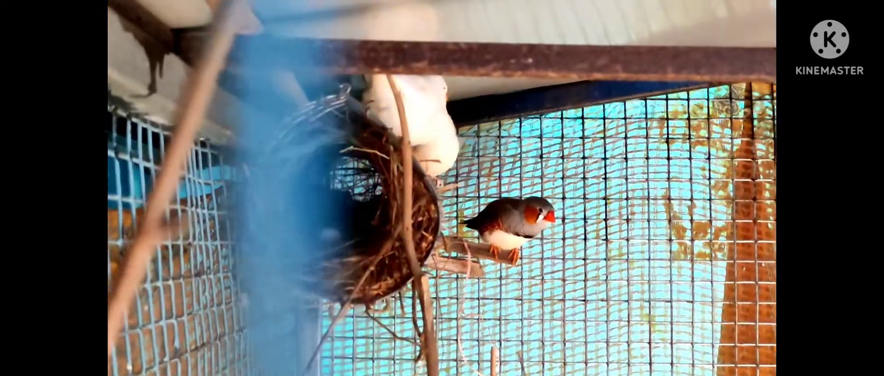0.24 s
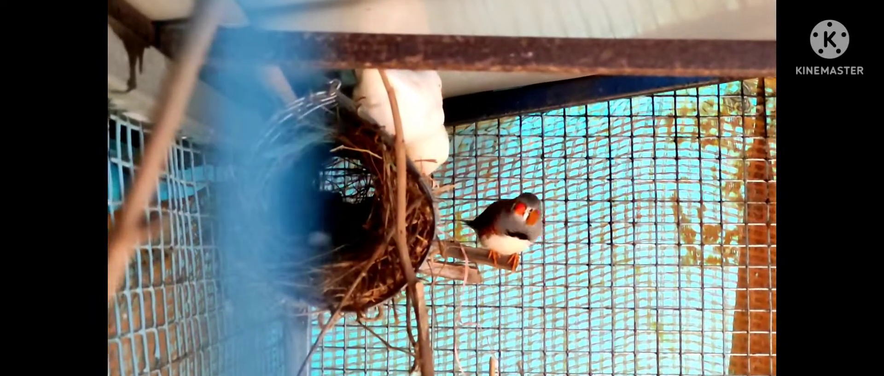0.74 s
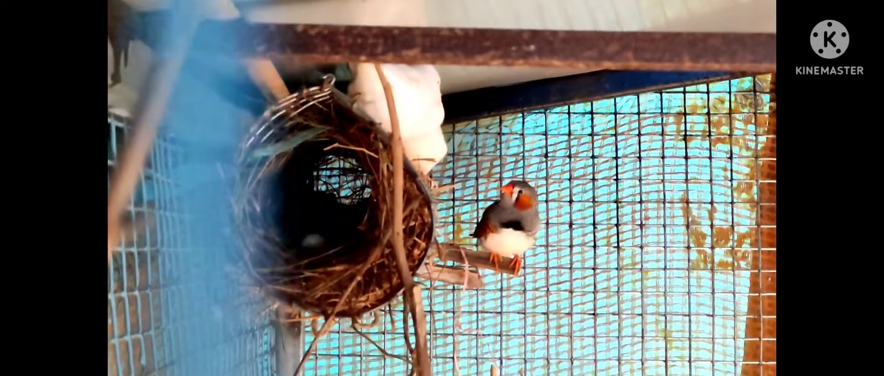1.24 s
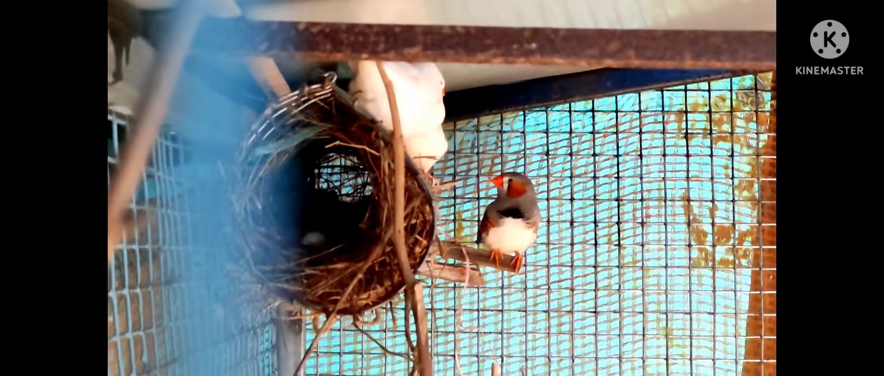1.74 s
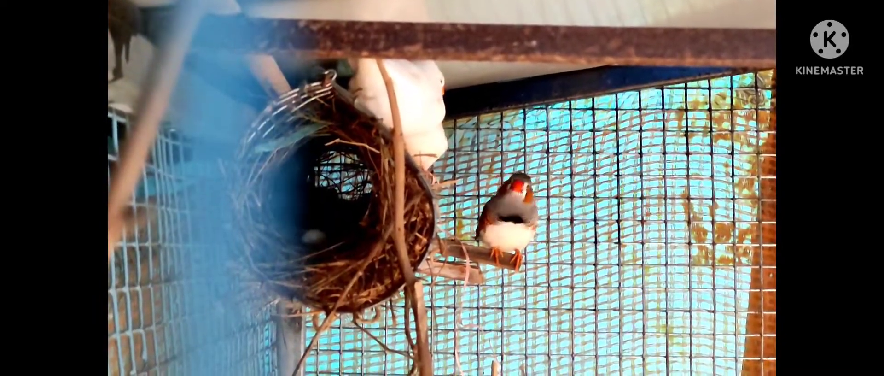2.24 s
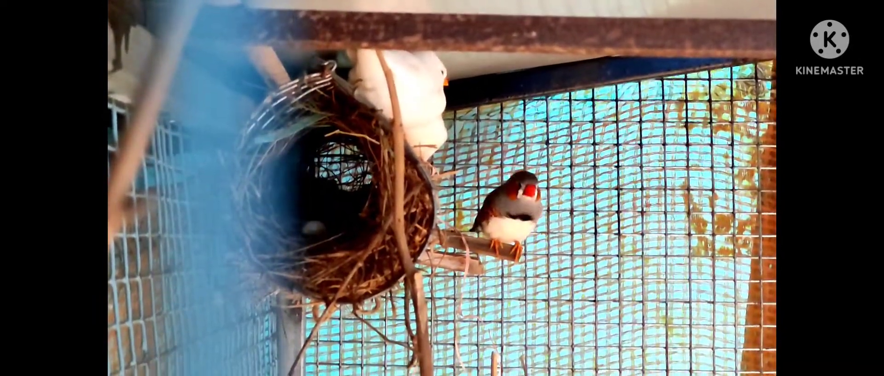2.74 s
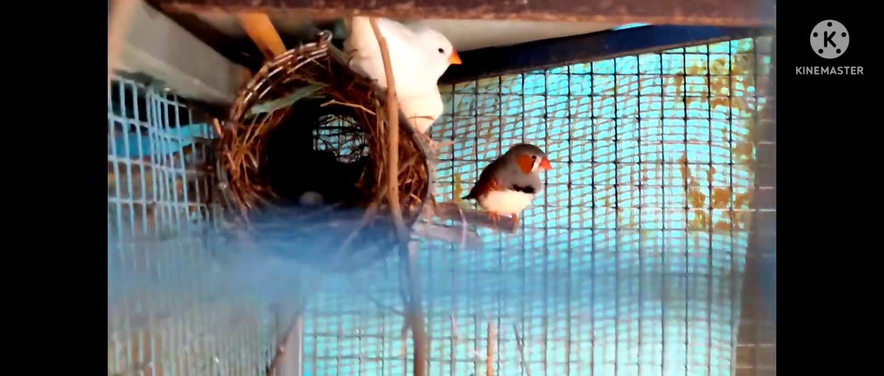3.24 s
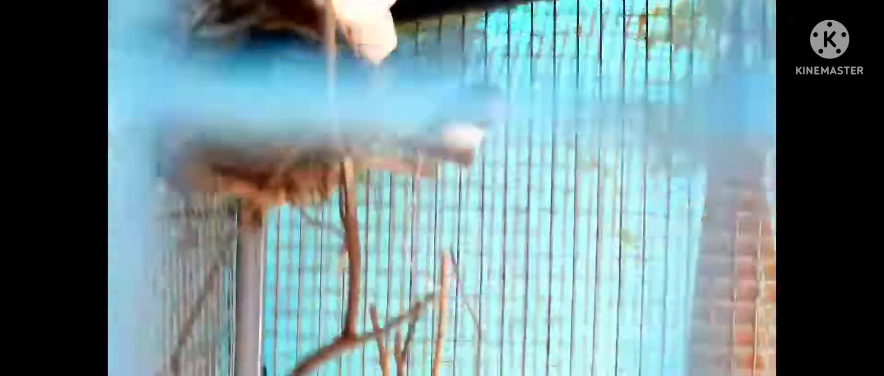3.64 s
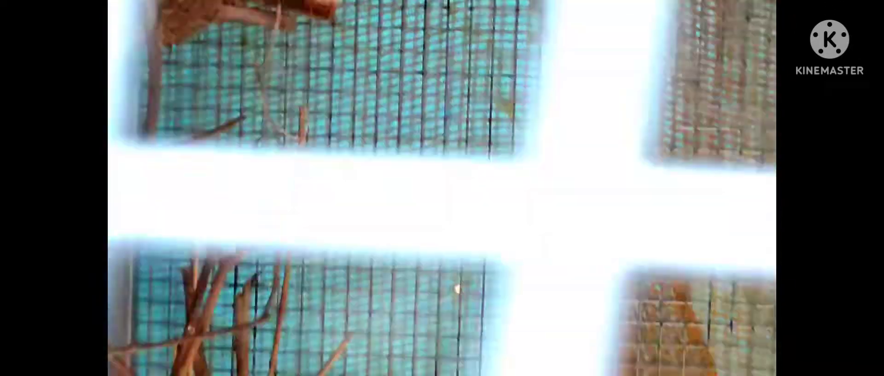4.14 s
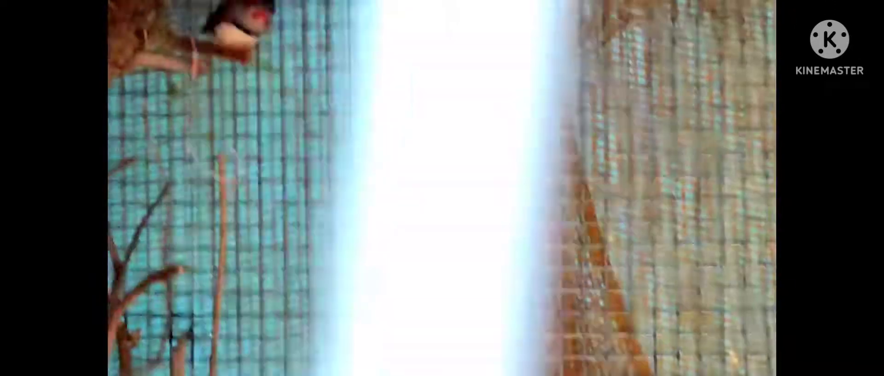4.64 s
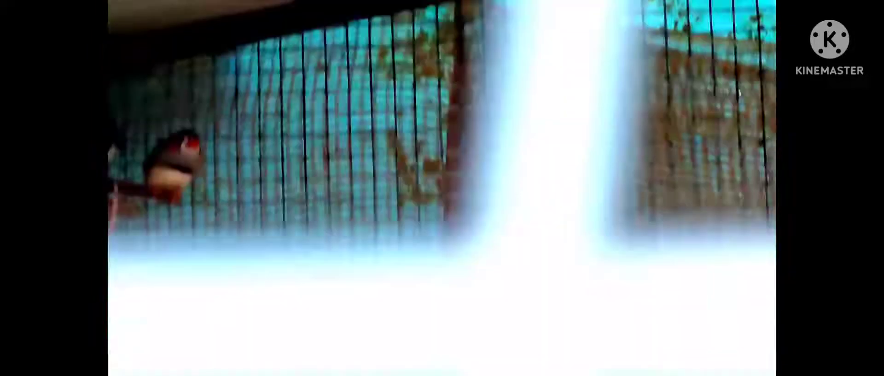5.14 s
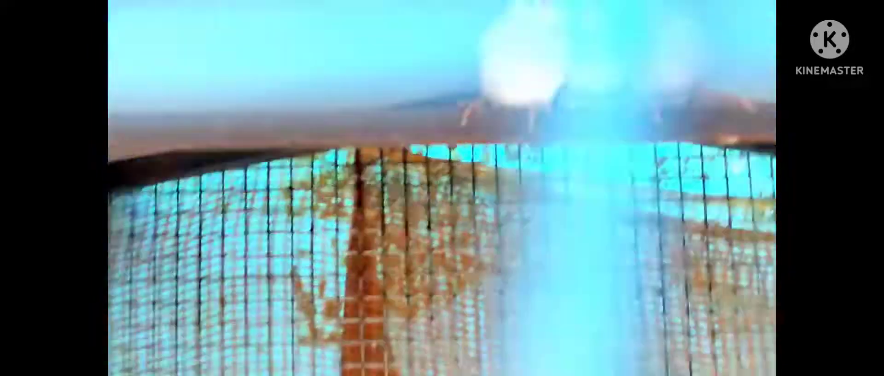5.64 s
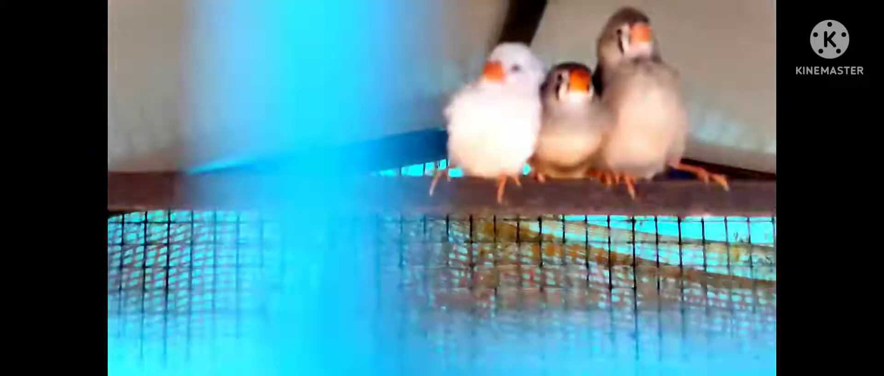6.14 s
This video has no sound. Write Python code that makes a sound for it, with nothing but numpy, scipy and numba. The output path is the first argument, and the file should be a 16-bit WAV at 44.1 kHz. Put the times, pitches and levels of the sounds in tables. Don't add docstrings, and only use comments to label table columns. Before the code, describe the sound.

Finch chicks rasp rapidly for food in a wire aviary while adults give nasal calls; midway a close bird shrieks with fluttering wings, then rumbling wind.

```python
import sys
import numpy as np
from scipy import signal
from scipy.fft import rfft, irfft
from scipy.io import wavfile
from scipy.ndimage import uniform_filter1d
from numba import njit

SR = 44100
rng = np.random.default_rng(int(sys.argv[2]) if len(sys.argv) > 2 else 0)


def voltage_ratio(level):
    return 10 ** (np.asarray(level, float) / 20)


def log_audio(samples):
    frames = np.atleast_2d(samples).T
    limited = np.clip(frames, -1, 1)
    pcm = np.round(limited * 32767).astype(np.int16)
    wavfile.write(sys.argv[1], SR, pcm)


N = 281799
T = np.arange(N) / SR

# start in seconds, length in seconds,
# effort in dB, gape in dB (how far the second and top groups of rings are lifted), tuning of the rings above 3
# kHz in percent.
NEST_RASPS = [(-.05, 0.17, -49, 0, .1), (.165, 0.19, -51, 1, 2.1), (.425, 0.16, -51, -1.5, .1),
              (.655, 0.17, -50, -2, 4.1), (.85, 0.21, -54, 2.5, .1), (1.14, 0.28, -45.5, -4.5, .1),
              (1.415, 0.18, -48.5, -2.5, .1), (1.675, 0.2, -46.5, -11, 1.5), (1.915, 0.19, -51, -5, .1),
              (2.155, 0.25, -48, -6.5, .1), (2.46, 0.16, -48.5, -12.5, .1), (2.715, 0.16, -49.5, -9, .1),
              (2.94, 0.28, -52.5, -9, .1), (3.27, 0.22, -48.5, -5, .1), (3.45, .13, -60.5, 0, .1),
              (3.565, 0.12, -46, -10.5, .1)]
PERCH_RASPS = [(3.9, 0.2, -52.5, -3.5, -1), (4.25, 0.19, -47, -9.5, -1.5), (4.42, 0.21, -50, -6, 2),
               (4.69, 0.22, -45, -12.5, 1.5), (4.965, 0.18, -47, -4.5, -2), (5.2, 0.18, -46, -8.5, 0.8),
               (5.42, 0.11, -45, -9.5, 0.8), (5.63, 0.13, -48, -4.5, -0.5), (5.82, .12, -48.5, -6.5, 4),
               (6.0, 0.097, -44.5, -14.5, 7), (6.17, 0.11, -43.5, -9.5, -2.5),
               (6.345, 0.059, -43, -9.5, -3)]
# pitch in Hz, width in Hz, level in dB.
NEST_THROAT = [
    [(2134, 119, 5.5), (2350, 210, -5), (1880, 160, -15)],
    [(3650, 420, 3.5), (4600, 260, -0.5), (4255, 250, 1)],
    [(5800, 1150, 16), (6760, 850, 12.5), (7300, 2600, 9.5), (13300, 1900, -5.5)],
]
PERCH_THROAT = [
    [(3854, 320, -1.5), (4600, 370, 3.5), (5064, 410, -0.6)],
    [(1804, 220, -4.5), (2483, 240, 1.5), (2230, 200, -5)],
    [(6520, 230, 1.5), (7000, 250, -3), (7420, 670, 0.5), (13000, 2300, -7.5)],
]
# time in seconds, pitch in Hz, level in dB.
SHRIEK_NOTES = [
    [(3.65, 4750, -36), (3.658, 4770, -24.5), (3.668, 4686, -24.5), (3.678, 4700, -34),
     (3.688, 4710, -25.5), (3.712, 4690, -60)],
    [(3.715, 2314, -46), (3.735, 3350, -37.5), (3.75, 3700, -28.5), (3.76, 4260, -24), (3.775, 4294, -28.5),
     (3.799, 4294, -38)],
    [(3.8, 2810, -42), (3.845, 2800, -44), (3.862, 2815, -34), (3.874, 3100, -44)],
    [(3.875, 3786, -32), (3.888, 3797, -37.5), (3.896, 3790, -47), (3.93, 3777, -57)],
    [(4.074, 5080, -33), (4.085, 5050, -25), (4.097, 4902, -26)],
    [(4.122, 4130, -16.5), (4.135, 4375, -12.5), (4.144, 4410, -10), (4.16, 4130, -18), (4.177, 3850, -22),
     (4.203, 3570, -30)],
    [(4.206, 3843, -34), (4.222, 3903, -14), (4.233, 3844, -18.5), (4.243, 3787, -25.5), (4.275, 3750, -42)],
]
# time in seconds, pitch in Hz, level in dB.
DUET_NOTES = [
    [(3.642, 3000, -48), (3.66, 3200, -44), (3.688, 3120, -52)],
    [(3.765, 4930, -44), (3.79, 5046, -42)],
    [(4.068, 3850, -41), (4.083, 3810, -39)],
    [(4.084, 4660, -28), (4.105, 4600, -24), (4.122, 4733, -25.5)],
    [(4.146, 4430, -18), (4.165, 4390, -23), (4.192, 4440, -35)],
]
# half-pitch level in dB, flutter depth from 0 to 1.
SHRIEK_ROUGHNESS = [(-33.5, .63), (-29, 0.47), (-32, 0.63), (-15.5, 0.51), (-8.5, 0.43), (-36, .4),
                    (-39, 0.29)]
# half-pitch level in dB, flutter depth from 0 to 1.
DUET_ROUGHNESS = [(-25, .9), (-24.5, .5), (-26, 0.47), (-9, .6), (-44, 0.15)]
# start in seconds, length in seconds,
# top pitch in Hz, top level in dB, brightness in dB per octave.
FLAT_CALLS = [(0.454, 0.089, 503, -62.5, 0), (1.234, 0.094, 587.6, -60.5, -1.1),
              (2.152, 0.074, 489, -65.5, 2.5), (2.941, 0.096, 586.5, -66.5, -0.6),
              (3.733, 0.097, 499, -65, -0.5), (4.411, 0.081, 607, -65.5, 2.5),
              (4.595, 0.081, 493, -64.5, 3.5)]
FALLING_CALLS = [(.297, 0.067, 1037, -53.5, .1), (.85, 0.065, 1007, -53, .1),
                 (1.966, 0.091, 998, -53.5, .1), (2.726, 0.065, 1037, -54.5, .1),
                 (3.217, .098, 1019, -52.5, .1), (4.662, 0.087, 962, -51.5, 4.0)]
# frequency in Hz, level in dB.
FLAT_THROAT = [(400, -19), (550, -6), (1000, 1.5), (2000, 11), (2800, 6.5), (4100, -3.5), (6000, -27)]
FALLING_THROAT = [(500, -1), (1000, 6.5), (2000, 7), (2800, 6.5), (3700, 16.5), (4600, 9.5), (6000, 0),
                  (9000, -18.5)]
# start in seconds, length in seconds, pitch in Hz, level in dB.
HELD_NOTES = [(.005, 0.073, 3490, -47), (1.295, 0.11, 3420, -43), (1.474, 0.021, 3380, -38.5),
              (1.497, .07, 3560, -45), (3.458, 0.034, 3740, -57), (3.5, 0.031, 3540, -53)]
# start in seconds, length in seconds, pitch in Hz, level in dB.
GRUNTS = [(.005, 0.031, 1550, -53), (1.3, 0.038, 1710, -50), (1.465, 0.039, 1475, -53)]
# start in seconds, level in dB, tail in seconds.
SWEEPS = [(.048, -45.5, 0.11), (1.332, -37.5, .065), (1.508, -38.5, 0.085)]
# start in seconds, length in seconds, rustle in dB, thump in dB.
WING_BEATS = [(3.655, 0.031, -44, -54), (3.7, 0.18, -53.5, -50), (3.87, 0.098, -59, -62),
              (4.075, 0.024, -45, -56), (4.1, 0.038, -42, -55), (4.14, 0.053, -49, -52),
              (4.18, 0.048, -41.5, -50), (4.6, 0.072, -61, -52.5), (5.5, 0.094, -64.5, -54.5),
              (5.562, .035, -61.5, -64), (5.6, 0.071, -68, -55), (5.67, 0.083, -62, -58)]
# time in seconds, peak in dB, ring in Hz, left minus right in dB.
TAPS = [(2.028, -39, 710, 5), (2.09, -42, 734, 4), (2.2, -40, 1560, -3.0), (2.379, -47.5, 740, -4),
        (2.656, -49.5, 546, -2), (3.667, -45, 335.8, -11), (4.633, -47, 1395, 12), (5.384, -50.5, 297, -10),
        (5.529, -47, 630, 11), (5.54, -47, 530, -8), (5.614, -43.5, 1320, 5), (5.627, -41.5, 545, -2),
        (5.746, -46, 350, -9), (5.488, -51, 170, -2), (5.583, -41, 139, -3), (5.615, -42, 152, 0),
        (5.752, -40.5, 129, -7), (6.28, -51, 198, 0), (6.039, -56, 414, 3.5), (6.084, -49.5, 700, 13),
        (6.271, -50.5, 324, 11)]
# start in seconds, length in seconds, rumble in dB, rub in dB.
GUSTS = [(.6, 0.26, -74, -72.5), (2.45, 0.27, -68, -86), (2.85, .2, -75, -68.5), (3.3, 0.72, -74, -66.5),
         (3.92, 0.43, -46.5, -62.5), (4.33, .2, -45, -55), (4.53, 0.2, -44.5, -64.5),
         (4.7, 0.51, -54.5, -68), (5.45, 0.22, -57, -59), (5.63, 0.2, -52.5, -53.5), (5.8, 0.89, -73, -73),
         (6.34, .1, -68, -52.5), (5.2, 0.27, -63.5, -70)]
# frequency in Hz, level in dB per Hz.
HUSH_COLOUR = [(35, -57), (60, -8.5), (1270, -10.5), (2140, -3), (3170, -8.5), (3890, -7), (5130, -15.5),
               (7740, -14.5), (8680, -16), (10900, -9), (11700, -30), (12500, -28), (14400, -18)]
# start in seconds, end in seconds, pitch in Hz, width in Hz, level in dB.
FAR_HUM = [(0, 6.4, 79., 16., -68), (3.55, 4.07, 1590., 15., -69), (1.95, 2.6, 550., 20., -72),
           (.1, .45, 3060., 30., -65), (5.8, 6.4, 1710., 25., -68)]
# left minus right in dB, lag of the right opening in ms, share of quick echoes,
# and for the near bird also the turn of phase round the phone's case in cycles.
SEATS = dict(nest=(-1.2, .15, 1), perch=(-4.5, 0.094, 0.84), flat=(-2.9, .2, 0.35), fall=(-3, 0.087, 0.37),
         near=(-3.6, .238, .15, .25), far=(-.4, -0.31, 1))
# frequency in Hz, dB against its neighbours.
FAINTEST_KEPT = [(2000, -14), (3200, -6), (4200, -11), (5200, -4.5), (6000, -8), (7200, -9), (8900, -1),
                 (10200, -4), (11200, -12), (12300, -10), (14000, -5)]


def chicks(rasps, throat):
    clicks_per_s, click_spread_db = 900, 1.5
    ring_swell_db, ring_grain_db, ring_wander_percent = 2.13, 2.5, 1.32
    beak_hz, beak_arch_percent = 3000, 3.46
    clicks = (rng.random(N) < clicks_per_s / SR) * voltage_ratio(click_spread_db * rng.standard_normal(N))
    clicks = unit(clicks * voltage_ratio(1.2 * walk(60))) + 1.4 * rng.standard_normal(N)

    parts = [np.clip((T - start) / length, 0, 1) for start, length, *_ in rasps]
    beak_percent = np.zeros(N)
    for (*_, tuning), part in zip(rasps, parts):
        arched = tuning + beak_arch_percent * (2 * np.sin(np.pi * part) - 1)
        beak_percent += arched * (part > 0) * (part < 1)

    def ring(hz, width, db):
        level = voltage_ratio(db + ring_swell_db * walk(20) + ring_grain_db * walk(140)) / np.sqrt(width)
        bend_percent = ring_wander_percent * walk(14) + beak_percent * (hz > beak_hz)
        return level * glide(clicks, hz * (1 + bend_percent / 100), 1.56 * width)

    first, second, top = [unit(sum(ring(*row) for row in group)) for group in throat]
    out = np.zeros(N)
    for (_, _, effort_db, gape_db, _), part in zip(rasps, parts):
        swell = np.clip(np.sin(np.pi * part), 0, 1) ** 0.61
        breath = swell * voltage_ratio(effort_db + 0.57 * (2 * part - 1))
        out += breath * (first + voltage_ratio(gape_db) * second + voltage_ratio(-5 + 0.96 * gape_db) * top)
    return out


def shriek(tune, roughness):
    tables = [[point + rough for point in note] for note, rough in zip(tune, roughness)]
    gate, (hz, db, half_db, depth) = notes(tables, edge_ms=2.7)
    depth = np.clip(depth, 0, 1)
    shake = .016 * depth * walk(350) + .05 * voltage_ratio(half_db) * walk(900)
    phase = 2 * np.pi * np.cumsum(hz * (1 + shake)) / SR
    flutter_hz = 215 * (1 + 0.24 * walk(40))
    flutter = 1 + depth * np.sin(2 * np.pi * np.cumsum(flutter_hz) / SR)
    second = voltage_ratio(-17.5 + 1.6 * walk(150)) * np.sin(2 * phase) * (hz < 4750)
    third = voltage_ratio(-13.5 + 0.4 * db + 2.33 * walk(150)) * np.sin(3 * phase) * (hz < 4500)
    half_pitch = voltage_ratio(half_db) * (np.sin(phase / 2) + 0.35 * np.sin(phase))
    tone = np.sin(phase) + second + third + half_pitch
    rasp = voltage_ratio(-19.5) * walk(3000) * np.sin(phase)
    return 0.95 * gate * voltage_ratio(db) * (flutter * tone * voltage_ratio(0.75 * depth * walk(400)) + rasp)


def nasal(tables, throat, boost_db, rasp_s, rasp_db, edge_ms, patchy_db):
    gate, (hz, db, rough, bright_db) = notes(tables, edge_ms)
    rough = np.clip(rough, 0, 1)
    phase = 2 * np.pi * np.cumsum(hz * (1 + .07 * rough * walk(700))) / SR
    stack = np.zeros(N)
    for k in range(1, 12):
        tilt_db = bright_db * np.log2(k * hz / 2500)
        level = voltage_ratio(on_log(throat, k * hz) + tilt_db + patchy_db * walk(90))
        stack += level * np.sin(k * phase + k * k)
    catch = np.zeros(N)
    for table in tables:
        since = T - table[0][0]
        catch += (since > 0) * np.exp(-(np.clip(since, 0, 1) / rasp_s) ** 2)
    voice = (1 - 0.64 * catch) * stack * (1 + rough * walk(400))
    return gate * voltage_ratio(db + boost_db) * (voice + catch * voltage_ratio(rasp_db) * coloured(throat))


def flat_call(start, length, hz, db, bright_db):
    rough = 0.091
    return [(start, hz * 0.93, db - 2, rough, bright_db),
            (start + length * 0.75, hz, db, rough, bright_db),
            (start + length, hz * .92, db + 0.5, rough, bright_db)]


def falling_call(start, length, hz, db, bright_db):
    hold_s, sag_hz_per_s, fade_db_per_s, rough = .029, 6200, 120, 0.4
    after_s = np.array([0, .8, 1]) * (length - hold_s)
    fade_db = -fade_db_per_s * after_s + [0, 0, -13]
    points = [(start, hz, db - 7.5, rough, bright_db)]
    for after, fade in zip(after_s, fade_db):
        points.append((start + hold_s + after, hz - sag_hz_per_s * after, db + fade, rough, bright_db))
    return points


def chirrup():
    def held(rows):
        return [[(start, hz, db), (start + length, hz, db)] for start, length, hz, db in rows]

    out = np.zeros(N)
    for side in (held(HELD_NOTES), sorted(held(GRUNTS) + [sweep(*row) for row in SWEEPS])):
        gate, (hz, db) = notes(side, edge_ms=0.98)
        waver = .028 * walk(160) + .024 * walk(900)
        phase = 2 * np.pi * np.cumsum(hz * (1 + waver)) / SR
        out += gate * voltage_ratio(db + 2.5 * walk(170)) * (1 + .4 * walk(1500)) * np.sin(phase)
    return out


def sweep(start, db, tail_s):
    low_hz, high_hz, rise_s = 1700, 3040, .044
    top = start + rise_s
    return [(start, low_hz, db),
            (start + rise_s / 2, (low_hz + high_hz) / 2, db - 6.5),
            (top, high_hz, db),
            (top + tail_s * 0.35, high_hz, db - 6.5),
            (top + tail_s, high_hz, db - 38)]


def wings():
    rustle_gain, thump_gain = swells(WING_BEATS, edge_s=0.059)
    # pitch in Hz, width in Hz, level in dB
    vanes = [(2440, 1400, -4.5), (4310, 2900, 3), (6460, 3200, -6.5), (7730, 1700, -7.5), (12300, 8300, -10.5)]

    def feathers():
        return sum(voltage_ratio(db + 4 * walk(45)) * unit(noise_band(hz, width)) for hz, width, db in vanes)

    rustle = np.array([feathers(), feathers()])
    grains = rng.standard_normal(N) * voltage_ratio(5.5 * walk(130))
    thump = unit(svf(svf(grains, 1040.0, 1900.0), 1040.0, 1900.0))
    return voltage_ratio(8.5) * rustle_gain * rustle + thump_gain * thump


def taps():
    out, t = np.zeros((2, N)), T[:4000]
    for start, db, hz, pan_db in TAPS:
        ring = np.sin(2 * np.pi * hz * t) * np.exp(-t / 0.0067)
        ring += .5 * np.sin(2 * np.pi * 1.85 * hz * t) * np.exp(-t / 0.0059)
        i = int(start * SR)
        out[:, i:i + len(t)] += voltage_ratio(db + np.array([[pan_db], [-pan_db]]) / 2) * ring[:N - i]
    return out


def wind():
    calm = voltage_ratio(np.array([[-68], [-73]]))
    rumble_gain, rub_gain = swells(GUSTS, edge_s=0.12) + calm

    def band(hz, width, next_hz, next_width):
        return unit(svf(svf(rng.standard_normal(N), hz, width), next_hz, next_width))

    rumble = np.array([band(31.0, 28.0, 33.0, 38.0) for _ in range(3)])
    rub = np.array([band(90.0, 840.0, 91.0, 910.0) for _ in range(3)])
    throb = np.sin(2 * np.pi * np.cumsum(27 + 2.51 * walk(9)) / SR)
    gust = rumble_gain * (0.52 * rumble[0] + 1.01 * throb + 0.3 * rumble[1:])
    return gust + rub_gain * voltage_ratio(2 * walk(25)) * (rub[0] + 0.97 * rub[1:])


def air():
    hush_db, insect_db, insect_pan_db = -58, -61.5, -7.5
    alike = coloured(HUSH_COLOUR)
    apart = np.array([coloured(HUSH_COLOUR) for _ in range(2)])
    low = signal.butter(1, 300, fs=SR, output="sos")
    hush = signal.sosfilt(low, alike) + apart - 0.16 * signal.sosfilt(low, apart)
    hum = np.zeros(N)
    for start, end, hz, width, db in FAR_HUM:
        hum += voltage_ratio(db) * (T > start) * (T < end) * unit(svf(rng.standard_normal(N), hz, width))
    # pitch in Hz, width in Hz, level in dB
    bands = [(10810, 750, 1), (11150, 250, -1.4), (11400, 340, 0.6)]

    def insects():
        return unit(sum(voltage_ratio(db + 2.3 * walk(8.9)) * noise_band(hz, width) for hz, width, db in bands))

    bugs = np.array([insects(), insects()])
    return voltage_ratio(hush_db) * hush + hum + voltage_ratio(insect_db + insect_pan_db * np.array([[.5], [-.5]])) * bugs


def ports(x, pan_db, lag_ms, echo=.4, turn=0):
    hz = np.arange(N // 2 + 1) * SR / N
    late_s = rng.uniform(.0005, .007, (2, 4, 1))
    path = 1 + echo * np.sum(np.exp(-2j * np.pi * hz * late_s - late_s / .008), axis=1) / 2
    path[1] *= np.exp(-2j * np.pi * (hz * lag_ms / 1000 + turn))
    return irfft(rfft(x) * path, N) * voltage_ratio(np.array([[pan_db], [-pan_db]]) / 2)


@njit
def walls(x, lags, gain, damp):
    line, soft, out = np.zeros((8, 4096)), np.zeros(8), np.zeros((2, len(x)))
    for i in range(len(x)):
        total = 0.
        for k in range(8):
            soft[k] += (1 - damp) * (gain[k] * line[k, (i - lags[k]) & 4095] - soft[k])
            total += soft[k]
            out[k % 2, i] += soft[k]
        for k in range(8):
            line[k, i & 4095] = x[i] + soft[k] - total / 4
    return out


def unit(x):
    return x / np.sqrt(np.mean(x ** 2))


@njit
def svf(x, hz, width):
    y, b, l = np.empty(len(x)), 0., 0.
    g, k = np.tan(np.pi * hz / SR), width / hz
    for i in range(len(x)):
        v = (b + g * (x[i] - l)) / (1 + g * (g + k))
        b, l, y[i] = 2 * v - b, l + 2 * g * v, k * v
    return y


@njit
def glide(x, hz, width):
    y, b, l, c, m = np.empty(len(x)), 0., 0., 0., 0.
    for i in range(len(x)):
        g, k = np.tan(np.pi * hz[i] / SR), width / hz[i]
        v = (b + g * (x[i] - l)) / (1 + g * (g + k))
        w = (c + g * (k * v - m)) / (1 + g * (g + k))
        b, l, c, m, y[i] = 2 * v - b, l + 2 * g * v, 2 * w - c, m + 2 * g * w, k * w
    return y


def noise_band(hz, width):
    return svf(svf(rng.standard_normal(N), float(hz), float(width)), float(hz), float(width))


def walk(rate):
    k = int(SR / rate)
    steps = np.repeat(rng.standard_normal(N // k + 1), k)
    return unit(uniform_filter1d(uniform_filter1d(steps, k), k)[:N])


def on_log(points, hz):
    f, db = np.transpose(points)
    return np.interp(np.log(hz), np.log(f), db)


def coloured(points):
    hz = np.arange(1, N // 2 + 2) * SR / N
    return unit(irfft(rfft(rng.standard_normal(N)) * voltage_ratio(on_log(points, hz)), N))


def notes(tables, edge_ms):
    seconds, *columns = np.concatenate(tables).T
    gate = np.zeros(N)
    for table in tables:
        inside_s = np.minimum(T - table[0][0], table[-1][0] - T)
        gate += np.clip(inside_s * 1000 / edge_ms, 0, 1)
    return gate, [np.interp(T, seconds, column) for column in columns]


def swells(rows, edge_s):
    gains = np.zeros((2, N))
    for start, length, *dbs in rows:
        inside_s = np.minimum(T - start, start + length - T)
        gains += voltage_ratio(np.array(dbs))[:, None] * np.clip(inside_s / edge_s + .5, 0, 1) ** 2
    return gains


def scene():
    nest = chicks(NEST_RASPS, NEST_THROAT)
    perch = chicks(PERCH_RASPS, PERCH_THROAT)
    near = shriek(SHRIEK_NOTES, SHRIEK_ROUGHNESS) + shriek(DUET_NOTES, DUET_ROUGHNESS)
    flat = nasal([flat_call(*row) for row in FLAT_CALLS], FLAT_THROAT,
                 boost_db=8.5, rasp_s=0.0042, rasp_db=-8, edge_ms=2.3, patchy_db=1)
    fall = nasal([falling_call(*row) for row in FALLING_CALLS], FALLING_THROAT,
                 boost_db=0, rasp_s=0.032, rasp_db=15.5, edge_ms=9.1, patchy_db=2.5)
    far = chirrup()
    birds = dict(nest=nest, perch=perch, flat=flat, fall=fall, near=near, far=far)
    direct = sum(ports(bird, *SEATS[name]) for name, bird in birds.items())

    lags = rng.integers(200, 1300, 8)
    fade_s = 0.18
    send = voltage_ratio(6.5) * (nest + perch) + voltage_ratio(-2.5) * (flat + fall) + voltage_ratio(2.5) * near + voltage_ratio(8) * far
    shed = walls(send + 1e-18, lags, voltage_ratio(-60 * lags / SR / fade_s), 0.42)
    return direct + voltage_ratio(-10.5) * shed + wings() + taps() + wind() + air()


def thin_treble(x, wobble_db):
    spec = signal.stft(x, nperseg=2048, noverlap=1024)[2]
    power = np.abs(spec[:, :1024].reshape(2, 128, 8, -1)) ** 2
    band_db = 10 * np.log10(np.mean(power, axis=(0, 2)) + 1e-20)
    band_db[84:] = band_db[83]
    around_db = uniform_filter1d(band_db, size=19, axis=0)
    wobble = unit(uniform_filter1d(rng.standard_normal(band_db.shape), size=3, axis=1))
    hz = (np.arange(128)[:, None] + .5) * SR / 256
    stands_out = band_db > around_db + on_log(FAINTEST_KEPT, hz) + wobble_db * wobble
    keep = stands_out & (hz < 14350) | (hz < 2000)
    top_db = uniform_filter1d(band_db, size=7, axis=0)
    top_db = top_db + 1.5 * unit(uniform_filter1d(wobble, size=7, axis=0))
    keep &= (hz < 11850) | (top_db > np.median(top_db[72:83]) - 1.5)
    spec[:, :1024] *= np.repeat(keep, 8, axis=0)
    return signal.istft(spec, nperseg=2048, noverlap=1024)[1][:, :N]


def roll_off(x):
    return signal.sosfilt(signal.butter(12, 14400, fs=SR, output="sos"), x)


def record(dry):
    mix = thin_treble(dry, wobble_db=3)
    return roll_off(mix)


dry = scene()
out = record(dry)
log_audio(out)
```